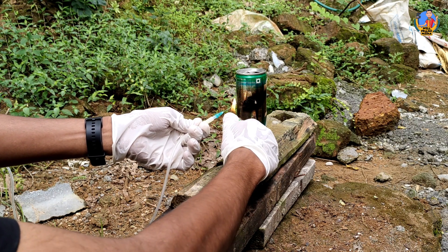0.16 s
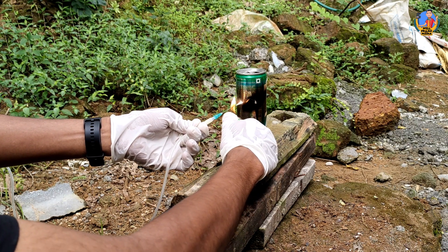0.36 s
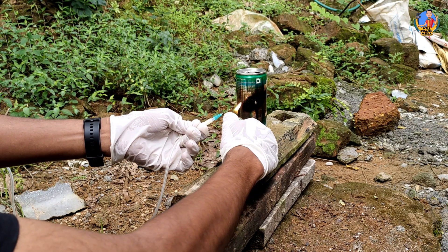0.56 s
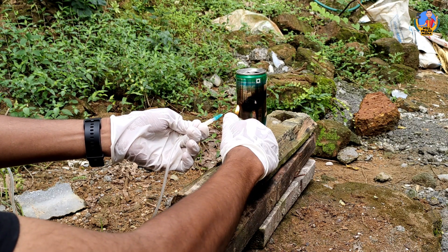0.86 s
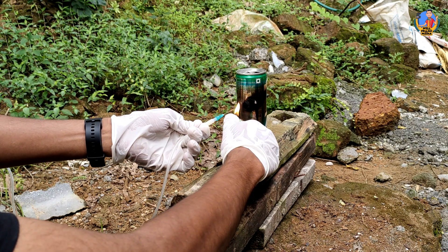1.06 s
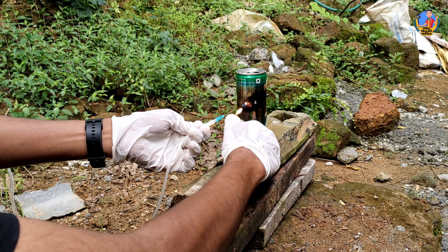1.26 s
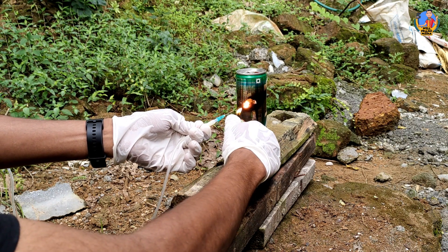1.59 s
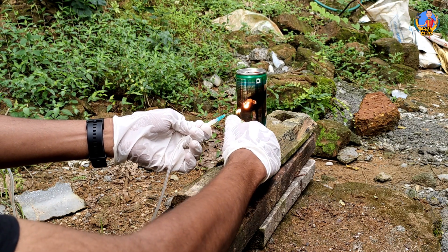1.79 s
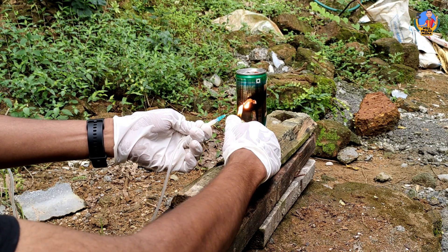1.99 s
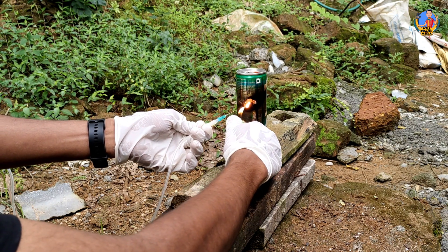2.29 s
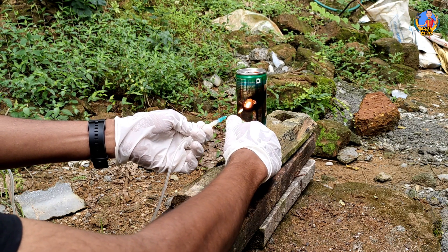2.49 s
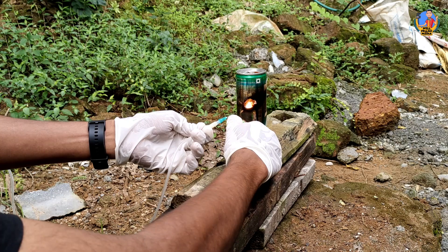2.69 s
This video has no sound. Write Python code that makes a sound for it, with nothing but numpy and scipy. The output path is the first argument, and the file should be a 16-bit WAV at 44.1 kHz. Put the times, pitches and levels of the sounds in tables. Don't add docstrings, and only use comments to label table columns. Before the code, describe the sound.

A small gas jet sputters in short bursts with dry snaps, holds as a fluttering burn, then blows steadily into a hollow metal can before popping out; microphone close, outdoors, very faint insects and distant traffic.

```python
import sys
import numpy as np
from scipy import signal
from scipy.fft import rfft, irfft
from scipy.io import wavfile

SR = 44100
rng = np.random.default_rng(int(sys.argv[2]) if len(sys.argv) > 2 else 0)


def natural_amplitude(level_db):
    exponent = np.asarray(level_db, float) / 20
    return 10 ** exponent


def store_wav(level_fs):
    pcm = np.round(np.clip(np.atleast_2d(level_fs), -1, 1) * 32767)
    wavfile.write(sys.argv[1], SR, pcm.T.astype(np.int16))


N = 125685
TIME = np.arange(N) / SR

# t/s, level/dB, share blown into the can/0-1, treble lift inside/dB
HELD_FLAME = [(1.239, -27, 0, 3), (1.6, -30, 0.04, 12), (1.68, -24.5, 0.08, 17.5), (1.76, -24.5, 0.08, 19),
              (1.8, -21, 0.83, 0.5), (1.86, -23.5, 0.67, 8), (1.95, -22, 0.91, 5.5),
              (2.05, -21.5, 0.99, -1.5), (2.19, -20.5, 0.98, -2), (2.3, -21.5, 0.98, -4),
              (2.4, -22, 0.98, -1.5), (2.5, -23, 0.98, -1), (2.6, -22, 0.91, 0), (2.701, -22, 0.71, 4.5),
              (2.79, -17, 0.82, 3)]
# start t/s, end t/s, start level/dB, end level/dB
ROAR_SPELLS = [
    (0.261, 0.31, -54, -28),
    (0.326, 0.414, -37, -27.5),
    (0.462, 0.533, -48, -35),
    (0.606, 0.727, -35.5, -28),
    (0.885, 0.948, -38, -36),
    (0.947, 1.02, -63, -32),
    (1.129, 1.242, -39, -37),
]
# f/Hz, level/dB
OPEN_ROAR_COLOUR = [(29, -51), (50, -26.5), (729, 2), (1620, -4.5), (2380, -4), (3180, -11.5), (9640, -23),
                    (11700, -19), (14500, -28), (16000, -45)]
# f/Hz, level/dB
CAN_ROAR_COLOUR = [(85, -22.5), (150, -15), (300, -10.5), (700, -5), (1250, -2), (1450, -25), (3500, -36.5),
                   (14300, -38.5), (16000, -55)]
# f/Hz, width/Hz, lift/dB
CAN_HOLLOW = [(744, 82, 6.5), (5600, 240, 8), (5670, 1800, 7), (3150, 120, 11), (7800, 300, -12),
              (9460, 430, -10), (7320, 880, 12.5), (10580, 2200, 8)]
# t/s, level/dB
HOLE_OPENING = [(1.7, -23), (1.85, 5), (1.95, -1)]
# t/s, f/Hz
HOLE_PITCH = [
    (1.6, 1780),
    (2.03, 2201),
    (2.4, 2168),
    (2.79, 2024),
]
# centre t/s,
# level/dB, length/s, treble lift/dB
GAS_PUFFS = [(0.281, -29, .005, 4), (0.471, -35, 0.0037, 4), (0.895, -27, 0.0055, 3.5),
             (1.1386, -28.5, 0.0037, 4.5), (0.299, -18, 0.016, 2), (0.347, -36, 0.0097, -20),
             (.361, -20, 0.013, -3), (0.398, -19, 0.02, 1.5), (0.48, -25, 0.015, 3.5),
             (0.516, -35, 0.013, 16), (0.605, -21.5, 0.011, 3), (0.632, -28, 0.0087, -7),
             (0.686, -18, 0.017, -11.5), (0.713, -19.5, 0.028, 0.5), (0.907, -17.5, 0.014, -2),
             (0.922, -22, 0.012, 2), (.935, -22, 0.016, 0), (.970, -23, 0.011, 3.5), (1.002, -18, 0.011, 2),
             (1.014, -17, 0.011, 0),
             (1.153, -17.5, .010, -1.5), (1.196, -16, 0.02, -3), (1.227, -14.5, 0.018, -6),
                  (1.268, -31, 0.0099, 2), (1.296, -28, 0.02, 0), (1.325, -23, 0.026, -10),
                  (1.339, -26, 0.018, -3), (1.373, -21, 0.02, -6.5), (1.402, -20, 0.028, -7),
                  (1.432, -14, 0.021, -5), (1.461, -19, 0.022, -5.5), (1.491, -20.5, 0.028, -3),
                  (1.515, -25, 0.027, 4), (1.525, -26.5, 0.018, -6), (1.557, -20.5, 0.033, -2),
                  (1.572, -26, 0.019, -15), (1.6, -21.5, 0.036, 0), (1.623, -20.5, 0.031, -3),
                  (1.631, -31, 0.0085, -14), (1.665, -20.5, 0.036, 0), (1.701, -26.5, 0.038, -4),
                  (2.002, -36, 0.011, 6), (2.777, -24, 0.03, 3), (2.851, -28.5, 0.042, 2)]
# f/Hz, level/dB
SPIT_COLOUR = [(88, -54), (150, -8), (2140, -8), (2760, 0.5), (3920, -8.5), (6770, -7), (8230, -14.5),
               (11700, -9), (15000, -19), (16000, -36)]
# t/s, peak level/dB, pulse width/ms
FLAME_POPS = [(0.2791, -5, 0.22), (0.4691, -17, 0.26), (0.4957, -11.5, 0.22), (0.5185, -11, 0.39),
              (.332, -25, 0.46), (.358, -19, 0.34), (.690, -16, 0.27), (0.7073, -12.5, 0.3),
              (.717, -14, .2), (0.8931, -10.5, 0.28), (0.9163, -9, 0.17), (0.9246, -8, 0.29),
              (0.9392, -10.5, 0.3), (0.9731, -10.5, 0.4), (1.0101, -7, 0.21), (1.1358, -13.5, 0.25),
              (1.1859, -6.5, 0.2), (1.2552, -11, 0.2), (1.269, -22, 0.39), (1.2809, -12, 0.15),
              (1.296, -19.5, 0.42), (1.318, -11.5, 0.31), (1.341, -19, 0.57), (1.369, -15.5, 0.44),
              (1.3992, -15.5, 0.6), (1.427, -18.5, 0.37), (1.438, -17, .2), (1.457, -14, .35),
              (1.484, -12, 0.2), (1.5015, -5, 0.23), (1.524, -18.5, 0.61), (1.548, -16, 0.31),
              (1.594, -19, 0.46), (1.616, -4.5, 0.2), (2.767, -15, 0.42), (2.7775, -10.5, 0.41),
              (2.786, -4.5, 0.18)]
# f/Hz, level/dB, t60/s
CAN_RING = [(380, 4, 0.0027), (714, -14.5, 0.028)]
# centre t/s, f/Hz, width/Hz, level/dB, half length/s
RIM_WHISTLE = (1.912, 4450, 260, -38, .022)
# f/Hz, width/Hz, both level/dB, left minus right level/dB
CLOSE_ECHOES = [(303.6, 21.5, 4.5, 1), (715, 205, -0.5, 9), (824, 21, -18, -6), (990, 290, 1.5, -8.5),
                (1176, 92, -2.5, 14.5), (1528, 190, 4, -6.5), (1780, 98, 2.5, 10.5),
                (2413, 230, -4.5, -7.5), (7100, 710, -5, 11), (8400, 120, 7, 4), (9270, 410, 5.5, 3.5),
                (10180, 360, -5, -15), (10630, 850, -10, -13), (10780, 190, 8.5, 9.5),
                (12900, 320, -22, 12)]
# f/Hz, width/Hz, level/dB
CAPSULE_SHADOWS = [(8050, 260, -8), (9750, 500, -9.5), (5350, 144, -2.5), (13000, 250, -6),
                   (14750, 300, -8)]
# f/Hz, likeness/0-1
CAPSULE_LIKENESS = [(130, 1), (650, 0.89), (950, 0.48), (1600, 1), (15000, 0.61)]
# f/Hz, t60/s
YARD_DECAY = [(300, 0.2), (2000, 0.32), (12000, 0.17)]
# f/Hz, level/dB
AIR_COLOUR = [(15, -27), (25, -7), (102, -6), (416, -16.5), (7510, -30.5), (9570, -31.5), (16000, -33)]
# t/s, level/dB
AIR_COURSE = [(0, -55), (.1, -59.5), (.25, -61), (0.849, -60.5)]
# f/Hz, width/Hz, level/dB
AIR_BANDS = [(9240, 140, -72), (1920, 63, -72), (1040, 530, -65)]

FLICKER_DB, PATCHY_DB = 1.5, 2
SPELL_DULL_DB, GRAIN_DB = -4, 2.5
HOLE_DB, HOLE_WIDTH_HZ = -10, 188
BASS_LAG_S = 0.0021
POP_TRIM_DB, CRACK_DB = -0.5, -15
THUMP_HZ, THUMP_WIDTH_HZ, THUMP_DB, HELD_THUMP_DB = 83.8, 34, -6, -5
BASS_CUT_HZ, LEFT_LAG_S, YARD_DB = 188, 0.000016, -17.5


def rms_one(x):
    return x / np.sqrt(np.mean(x ** 2) + 1e-20)


def at_hz(points, hz):
    table_hz, values = np.transpose(points)
    return np.interp(np.log(hz), np.log(table_hz), values)


def drift(rate_hz):
    r = np.exp(-16 * np.pi * rate_hz / SR)
    slow = signal.lfilter([1], [1, -2 * r, r * r], rng.standard_normal(N // 8 + 4002))[4000:]
    return np.interp(np.arange(N) / 8, np.arange(len(slow)), rms_one(slow))


def bell(x, hz, width_hz, db):
    a, w = natural_amplitude(db / 2), 2 * np.pi * hz / SR
    q = np.pi * width_hz / SR
    zeros = [1 + q * a, -2 * np.cos(w), 1 - q * a]
    poles = [1 + q / a, -2 * np.cos(w), 1 - q / a]
    return signal.lfilter(zeros, poles, x)


def band_pass(order, hz, width_hz):
    return signal.butter(order, [hz - width_hz / 2, hz + width_hz / 2], "band", fs=SR, output="sos")


def noise(colour, alike=0.9):
    hz = np.maximum(np.fft.rfftfreq(N, 1 / SR), 1)
    mid, side = rfft(rng.standard_normal((2, N)))
    likeness = np.clip(alike * at_hz(CAPSULE_LIKENESS, hz), 0, 1)
    pair = np.sqrt(1 + likeness) * mid + np.sqrt(1 - likeness) * side * [[1], [-1]]
    return rms_one(irfft(pair * natural_amplitude(at_hz(colour, hz)), N))


def narrow_tone(turn, width_hz):
    return drift(width_hz) * np.cos(turn) + drift(width_hz) * np.sin(turn)


def split(x, edges_hz):
    size = x.shape[-1]
    hz = np.maximum(np.fft.rfftfreq(size, 1 / SR), 1)
    spectrum = rfft(x)
    below = [0] + [1 / (1 + (hz / edge) ** 4) for edge in edges_hz] + [1]
    return [irfft(spectrum * (upper - lower), size) for lower, upper in zip(below, below[1:])]


def turbulent(x, depth):
    shared = FLICKER_DB * drift(48)
    bands = split(x, [300, 1400, 3000, 7000])
    return sum(band * natural_amplitude(depth * (shared + PATCHY_DB * drift(21))) for band in bands)


def ramped(start, end, ramp_s):
    return np.clip(np.minimum(TIME - start, end - TIME) / ramp_s, 0, 1)


def roar():
    t, db, share, lift_db = np.transpose(HELD_FLAME)
    held = natural_amplitude(np.interp(TIME, t, db)) * ramped(t[0], t[-1], 0.015)
    share = np.clip(np.interp(TIME, t, share), 0, 1)
    treble = natural_amplitude(np.interp(TIME, t, lift_db))
    open_level = held * np.sqrt(1 - share)
    for start, end, db0, db1 in ROAR_SPELLS:
        spell = natural_amplitude(np.interp(TIME, [start, end], [db0, db1]))
        open_level = open_level + spell * ramped(start, end, 0.0032)
    inside = held * np.sqrt(share) * can_roar(treble)
    outside = open_level * open_roar(t[0])
    return turbulent(outside + inside, depth=1 - 0.41 * share)


def open_roar(hold_s):
    low, high = split(noise(OPEN_ROAR_COLOUR), [3500])
    return (low + high * natural_amplitude(SPELL_DULL_DB * (TIME < hold_s))) * natural_amplitude(GRAIN_DB * drift(150))


def can_roar(treble):
    inside = noise(CAN_ROAR_COLOUR)
    for hz, width_hz, db in CAN_HOLLOW:
        inside = bell(inside, hz, width_hz, db)
    low, high = split(rms_one(inside), [2800])
    deep, edge = split(low, [1180])
    opening = natural_amplitude(np.interp(TIME, *np.transpose(HOLE_OPENING)))
    return bell(deep + edge * opening + hole(), 2420, 240, -3) + high * treble


def hole():
    turn = 2 * np.pi * np.cumsum(np.interp(TIME, *np.transpose(HOLE_PITCH))) / SR
    return natural_amplitude(HOLE_DB) * narrow_tone(turn, HOLE_WIDTH_HZ)


def spits():
    bands = split(noise(SPIT_COLOUR), [600, 1300, 2200, 3500, 4700, 6500, 9500])
    bands = [band * natural_amplitude(2.5 * drift(25)) for band in bands]
    body, hiss = sum(bands[:4]), sum(bands[4:])
    soft, bright = np.zeros((2, N))
    for t, db, length, lift_db in GAS_PUFFS:
        near = slice(int((t - 3 * length) * SR), int((t + 4 * length) * SR))
        parts = [(soft, BASS_LAG_S / 2, natural_amplitude(db)), (bright, -BASS_LAG_S / 2, natural_amplitude(db + lift_db))]
        for envelope, lag, gain in parts:
            u = (TIME[near] - t - lag) / length
            envelope[near] += gain * np.exp(-0.5 * np.where(u < 0, -u / 0.17, u / 0.24) ** 2.4)
    return (soft * body + bright * hiss) * natural_amplitude(2.05 * drift(163))


def pops():
    pulse, clicks, crack = np.zeros((3, N))
    for t, db, width_ms in FLAME_POPS:
        near = slice(int((t - 0.003) * SR), int((t + 0.02) * SR))
        since = TIME[near] - t
        u = since / (width_ms * 0.00052)
        pulse[near] += natural_amplitude(db + POP_TRIM_DB) * (0.95 * u ** 2 - 1) * np.exp(-u ** 2 / 2)
        crack[near] += natural_amplitude(db + CRACK_DB) * (u > 0) * np.exp(-np.abs(since) / 0.0021)
        clicks[int((t + 0.0002) * SR)] = natural_amplitude(db) * width_ms / 0.25
    out = pulse + crack * noise(SPIT_COLOUR)
    for hz, db, t60 in CAN_RING:
        r, w = natural_amplitude(-60 / (t60 * SR)), 2 * np.pi * hz / SR
        ring = [1, -2 * r * np.cos(w), r * r]
        out = out + signal.lfilter([0, np.sin(w)], ring, clicks * natural_amplitude(db) + 1e-18)
    return out


def whistle():
    t, hz, width_hz, db, half_s = RIM_WHISTLE
    envelope = np.exp(-0.5 * ((TIME - t) / half_s) ** 4)
    return natural_amplitude(db) * envelope * narrow_tone(2 * np.pi * hz * TIME, width_hz)


def ground_thump(blast):
    band = band_pass(1, THUMP_HZ, THUMP_WIDTH_HZ)
    holding = np.clip((TIME - HELD_FLAME[0][0]) / 0.05, 0, 1)
    thump = signal.sosfilt(band, signal.sosfilt(band, blast))
    return natural_amplitude(THUMP_DB + HELD_THUMP_DB * holding) * thump


def close_echoes(flame):
    left, right = flame
    for hz, width_hz, db, lean_db in CLOSE_ECHOES:
        left = bell(left, hz, width_hz, db + lean_db / 2)
        right = bell(right, hz, width_hz, db - lean_db / 2)
    lag = np.exp(-2j * np.pi * np.fft.rfftfreq(N, 1 / SR) * LEFT_LAG_S)
    return np.array([irfft(rfft(left) * lag, N), right])


def yard(flame):
    t = np.arange(SR // 2) / SR
    edges = [500, 1500, 5000]
    bands = split(rng.standard_normal((2, len(t))), edges)
    decays = [natural_amplitude(-60 * t / at_hz(YARD_DECAY, hz)) for hz in edges + [SR / 3]]
    echo = sum(band * decay for band, decay in zip(bands, decays)) * np.clip(t / 0.01, 0, 1)
    echo = echo / np.sqrt(np.sum(echo ** 2, axis=1, keepdims=True))
    return natural_amplitude(YARD_DB) * signal.fftconvolve(flame.mean(0)[None], echo, axes=1)[:, :N]


def capsule_shadows(pair):
    left, right = pair
    mid = (left + right) / 2
    for hz, width_hz, db in CAPSULE_SHADOWS:
        mid = bell(mid, hz, width_hz, db)
    return mid + (left - right) / 2 * [[1], [-1]]


def air():
    t, level_db = np.transpose(AIR_COURSE)
    out = natural_amplitude(np.interp(TIME, t, level_db) + 0.4 * drift(24)) * noise(AIR_COLOUR, alike=0.5)
    fade_db = np.interp(TIME, t, level_db - level_db[1])
    for hz, width_hz, db in AIR_BANDS:
        thin_band = rms_one(signal.sosfilt(band_pass(2, hz, width_hz), rng.standard_normal((2, N))))
        course_db = (hz < 2500) * 2 * fade_db
        out = out + natural_amplitude(db + course_db + 2.2 * drift(25)) * thin_band
    return out


def scene():
    blast = roar() + spits() + pops() + whistle()
    bass_cut = signal.butter(4, BASS_CUT_HZ, "high", fs=SR, output="sos")
    flame = signal.sosfilt(bass_cut, blast) + ground_thump(blast)
    return capsule_shadows(close_echoes(flame) + yard(flame)) + air()


def band_limit(x):
    return signal.sosfilt(signal.butter(12, 16510, fs=SR, output="sos"), x)


def record(dry):
    top_cut = signal.cheby2(14, 55, 16000, fs=SR, output="sos")
    mix = signal.sosfilt(top_cut, dry)
    return band_limit(mix)


dry = scene()
out = record(dry)
store_wav(out)
```